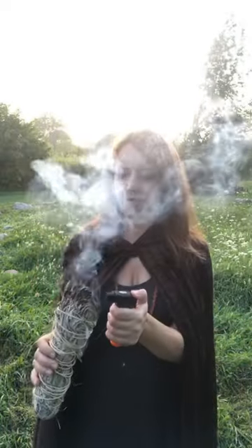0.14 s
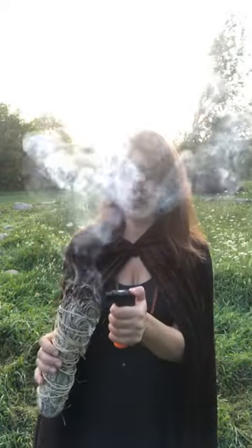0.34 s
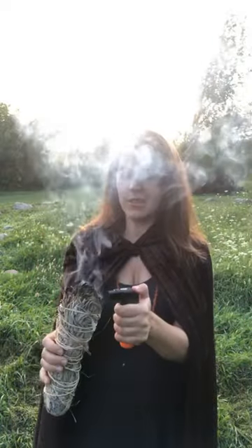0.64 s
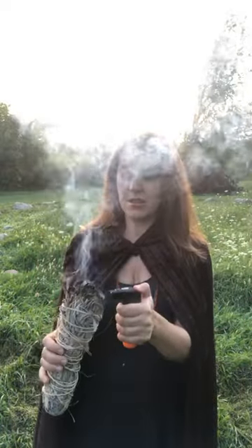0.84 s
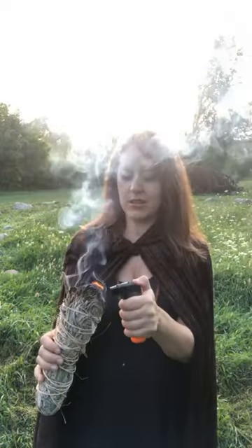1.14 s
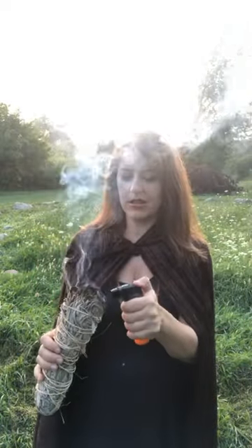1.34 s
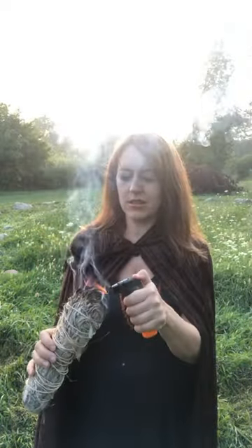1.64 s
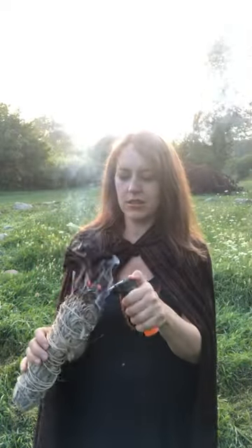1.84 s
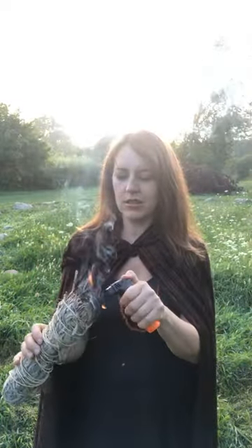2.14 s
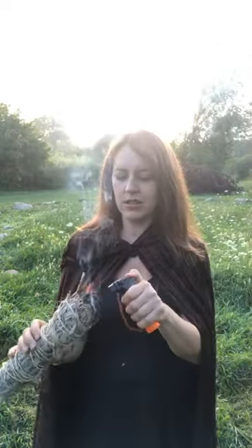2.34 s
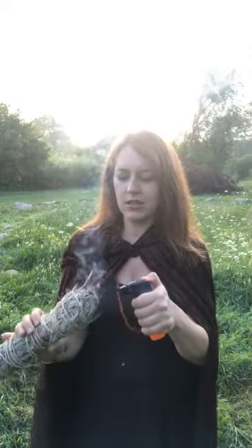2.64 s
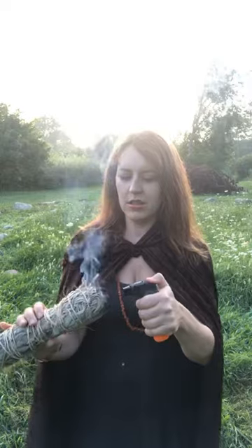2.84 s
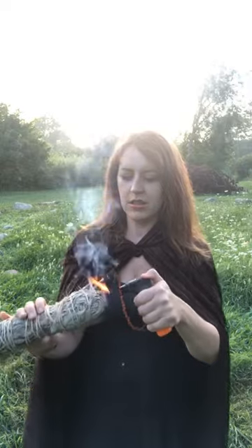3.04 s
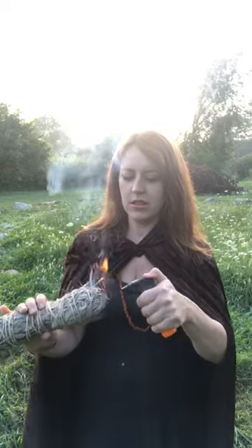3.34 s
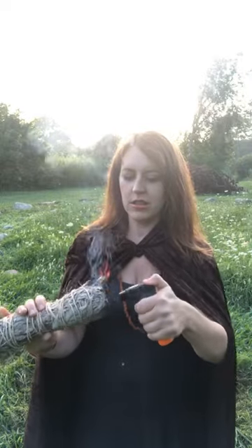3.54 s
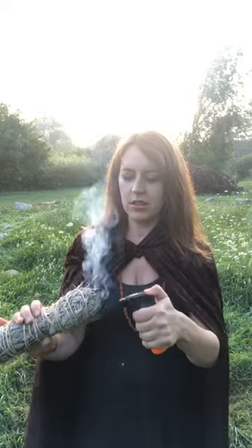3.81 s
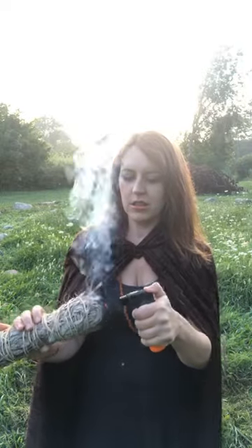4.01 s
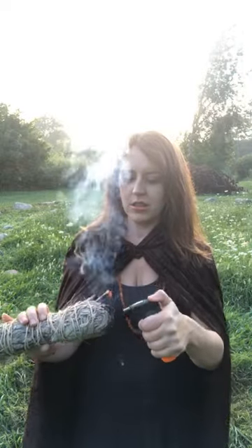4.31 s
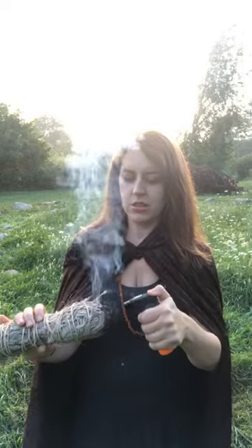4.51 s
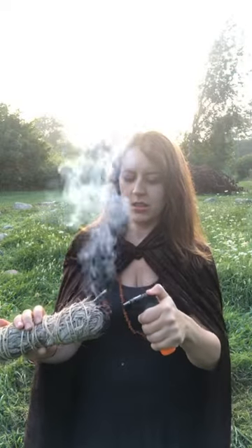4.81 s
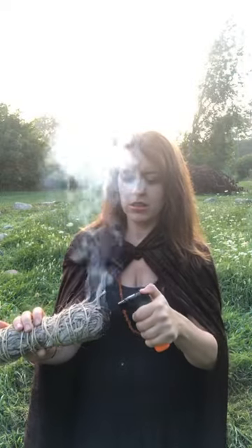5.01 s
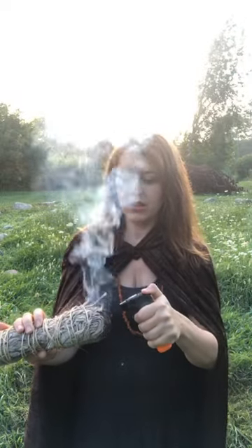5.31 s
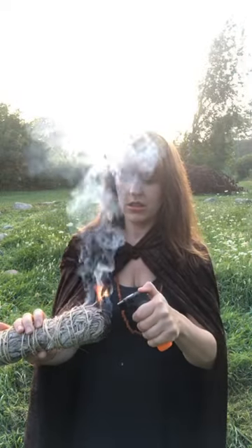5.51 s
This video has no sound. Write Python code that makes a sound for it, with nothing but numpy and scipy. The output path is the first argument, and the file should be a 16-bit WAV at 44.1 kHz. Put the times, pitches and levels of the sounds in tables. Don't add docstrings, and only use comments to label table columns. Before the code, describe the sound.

A piezo striker clicks very loudly at the start, with a soft puff as gas ignites. A quiet, airy flame roar and bright nozzle hiss continue to the end, dipping in gusts and brightening as the torch tips. Sparse herb crackles, quick bird chirps and a later warbling song sit over distant traffic rumble, heard on a phone in an open field.

```python
import sys
import numpy as np
from scipy import signal
from scipy.fft import rfft, irfft, next_fast_len
from scipy.io import wavfile
from scipy.ndimage import uniform_filter1d

SR = 44100
rng = np.random.default_rng(int(sys.argv[2]) if len(sys.argv) > 2 else 0)


def dump(signal):
    limited = np.clip(np.atleast_2d(signal).T, -1, 1)
    pcm = np.round(limited * 32767).astype(np.int16)
    wavfile.write(sys.argv[1], SR, pcm)


def volts_from_decibels(level):
    exponent = np.asarray(level, float) / 20
    return 10 ** exponent


N = 249606
TIME = np.arange(N) / SR
SIZE = next_fast_len(N, real=True)
FREQ = np.fft.rfftfreq(SIZE, 1 / SR)


def torch():
    # (frequency [Hz], density [dB per Hz])
    roar_near = [(330, -43), (480, -11.5), (540, -7.5), (650, -1), (786, -2.5), (865, -8.5), (1060, -1),
                 (1440, -3), (1900, -4), (2500, -10), (3300, -20.5)]
    # (frequency [Hz], density [dB per Hz])
    roar_down = [(330, -42), (480, -12.5), (560, -3.5), (799, 0), (879, -6), (982, -7), (1080, -0.5),
                 (1540, -1), (2010, -2.5), (2500, -8.5), (3300, -27)]
    # (frequency [Hz], density [dB per Hz])
    flame_edge = [(1700, -29), (2400, -3), (3000, -2), (3800, -1.5), (4870, -6), (6000, -7), (7500, -9),
                  (8800, -16), (11000, -27)]
    # (frequency [Hz], density [dB per Hz])
    nozzle_jet = [(5000, -29), (7500, -9.5), (8900, -19), (10400, -11.5), (13300, -1.5), (14200, 0),
                  (15100, 0.5), (16000, -6)]
    # (frequency [Hz], density [dB per Hz])
    unlit_gas = [(350, -32), (550, -10), (3080, -11), (4400, -11), (6000, -9), (7000, -3), (9030, -14),
                 (11000, -0.5), (13500, -8), (16000, -12)]
    # (time [s], level [dB])
    aim = [(0.2, -2.5), (0.4, -4.5), (0.62, -3.5), (0.9, -5), (1.2, -1), (1.5, -2), (1.65, -3), (1.9, -6),
           (2.15, -5.5), (2.27, -0.5), (2.45, -1.5), (2.55, 3), (2.75, 0.5), (3.36, 1), (3.55, 2),
           (4.82, 1.5), (5.12, 2), (5.66, 0.5)]
    # (time [s], half length [s], jet change [dB])
    gusts = [
        (0.95, 0.04, -4),
        (1.39, 0.04, -3.5),
        (1.55, 0.055, -4),
        (1.95, 0.023, -6.5),
        (2.06, 0.075, -5),
        (3.8, 0.15, -1.5),
        (4.01, 0.025, -2.5),
        (4.25, 0.05, 0),
        (5.01, 0.059, -4),
    ]
    # (time [s], half length [s], flame change [dB])
    flares = [
        (1.726, 0.082, 2.5),
        (2.0, 0.021, 3.5),
        (2.17, 0.021, 1.5),
        (3.64, 0.14, 1.5),
        (2.28, 0.043, -3),
    ]

    aim_db = np.interp(TIME, *np.transpose(aim))
    gust_db = bumps(gusts)
    flare_db = bumps(flares)
    roar_db = -54 + 0.22 * gust_db + flare_db
    edge_db = -59.5 + 0.22 * aim_db + 0.31 * gust_db + flare_db
    jet_db = -59.5 + aim_db + gust_db
    uncover_db = np.interp(TIME, (2.42, 2.64), (-7, 0))
    whistle_db = -70.5 + 0.4 * aim_db + 0.3 * gust_db + uncover_db

    ignite_s, catch_s = 0.072, 0.017
    lit = 1 - np.exp(-np.clip(TIME - ignite_s, 0, 1) / catch_s)
    tip = np.interp(TIME, (1.86, 2.6), (0, np.pi / 2))
    roar = np.cos(tip) * turbulence(shape(roar_near), 0.63, 9.13, 0.66)
    roar = roar + np.sin(tip) * turbulence(shape(roar_down), 0.44, 9, 0.3)
    flame = roar * volts_from_decibels(roar_db) + turbulence(shape(flame_edge), 0.67, 14, 0.44) * volts_from_decibels(edge_db)
    jet = turbulence(shape(nozzle_jet), 0.6, 13, 0.9) * volts_from_decibels(jet_db)
    whistle = turbulence(peak(9550, width_hz=590) ** 2, 0.6, 7.1, 0.6) * volts_from_decibels(whistle_db)
    raw_gas = turbulence(shape(unlit_gas), 0.75, 18, 0.47) * volts_from_decibels(-57)
    return lit * (flame + jet + whistle) + (1 - lit) * raw_gas


def striker():
    # (time [s], peak [dB], decay [ms])
    snaps = [
        (0.082, -26, 0.21),
        (0.0814, -4.5, 0.28),
        (0.0818, -9.5, 0.28),
        (0.0832, -8, 0.6),
        (0.087, -26, 0.55),
    ]
    # (frequency [Hz], density [dB per Hz])
    snap_colour = [(500, -40), (1200, -37), (1740, -37), (2170, -14), (3800, -9), (4940, -1.5),
                   (5630, -5.5), (6790, -1.5), (8450, -6), (9640, 1.5), (10900, -2), (12400, -4),
                   (14300, 0.5), (16500, -23)]
    # (frequency [Hz], level [dB], t60 [s])
    shell = [(6358, -11, 0.054), (9300, 2, 0.029), (10300, -5, 0.06), (11200, -9, 0.051),
             (11540, -12, 0.066), (12410, -12, 0.048), (12300, -12, 0.04), (13420, -15, 0.085),
             (14280, -18, 0.1), (15500, -14, 0.049)]
    # (frequency [Hz], level [dB], t60 [s])
    hammer = [(5000, -10, 0.0029), (3720, -15, 0.0027), (6720, -18, 0.0035), (9900, -15, 0.004),
              (13300, -13, 0.003)]

    t = TIME[:SR // 3]
    blow, spray = rng.standard_normal((2, len(t)))
    strike_s = snaps[1][0]
    snap = blow * sum(volts_from_decibels(db - 0.1) * burst(s, ms, t) for s, db, ms in snaps)
    after = np.clip(t - strike_s, 0, 1)
    direct = snap + volts_from_decibels(-32) * modes(shell, after) + volts_from_decibels(-2.5) * modes(hammer, after)

    ground_s = 0.0066
    echo = volts_from_decibels(-16) * np.roll(direct, int(ground_s * SR))
    near_grass = volts_from_decibels(-32.5) * burst(strike_s + ground_s, 7.8, t)
    far_grass = volts_from_decibels(-43.0) * burst(strike_s, 43, t)
    scatter = spray * (near_grass + far_grass)

    puff_s, puff_hz = 0.0855, 325
    puff = volts_from_decibels(-35) * burst(puff_s, 2.5) * np.sin(2 * np.pi * puff_hz * (TIME - puff_s))
    return coloured(unit(shape(snap_colour)), direct + echo + scatter) + puff


def herbs():
    # (time [s], peak [dB], centre [Hz], width [Hz])
    crackles = [
        (0.467, -46, 10500, 3000),
        (1.179, -43, 11000, 4000),
        (1.6205, -52, 12000, 5000),
        (1.999, -48, 4500, 5000),
        (3.5416, -32.5, 8000, 9000),
        (3.5427, -33, 5000, 11000),
    ]
    out = np.zeros(N)
    t = TIME[:256]
    for s, db, hz, width in crackles:
        grain = rng.standard_normal(len(t)) * burst(0, 0.42, t)
        pop = signal.lfilter(*signal.iirpeak(hz, hz / width, SR), grain)
        out[int(s * SR):][:len(t)] += volts_from_decibels(db) * pop / np.abs(pop).max()
    return out


def birds():
    chirper = coloured(peak(4700, width_hz=1400), chirper_song())
    warbler = coloured(peak(5350, width_hz=2200), warbler_song())
    lag = TIME[:SR // 2]
    hedge_t60_s = 0.18
    hedge = rng.standard_normal(len(lag)) * 1000 ** (-lag / hedge_t60_s) * (lag > 0.003)
    sent = volts_from_decibels(0.4) * (volts_from_decibels(-5) * chirper + warbler)
    return chirper + warbler + signal.fftconvolve(sent, hedge / np.linalg.norm(hedge))[:N]


def chirper_song():
    # (start [s], length [s], from [Hz], to [Hz], level [dB])
    chirps = [(0.0, 0.022, 4300, 4750, -54), (0.105, 0.035, 4180, 4590, -62),
              (0.195, 0.062, 3600, 4790, -59), (1.93, 0.04, 5000, 5400, -62),
              (2.052, 0.042, 4200, 4900, -58), (2.155, 0.05, 3700, 4800, -58),
              (2.272, 0.048, 3700, 4820, -57), (2.422, 0.048, 3900, 4880, -58),
              (5.148, 0.05, 5050, 5270, -67), (5.207, 0.022, 4050, 4880, -62),
              (5.272, 0.032, 4350, 4870, -56), (5.322, 0.068, 4000, 5000, -61),
              (5.403, 0.036, 3950, 4850, -56)]
    return volts_from_decibels(0.5) * sing(chirps, bend=0.9, loudest=0.68, start_db=-5, end_db=-6)


def warbler_song():
    # (start [s], length [s], from [Hz], to [Hz], level [dB])
    drops = [
        (2.876, 0.03, 6150, 5380, -56),
        (3.088, 0.045, 6500, 5300, -60),
        (3.28, 0.055, 6550, 5200, -58),
        (3.49, 0.038, 6650, 5130, -59),
        (3.662, 0.048, 4550, 3550, -56),
        (3.84, 0.047, 4800, 3250, -54),
    ]
    # (start [s], length [s], from [Hz], to [Hz], level [dB])
    droops = [
        (2.92, 0.045, 5250, 4700, -62),
        (3.133, 0.052, 5280, 4050, -56),
        (3.355, 0.04, 5250, 4450, -58),
        (3.535, 0.055, 5200, 4780, -61),
    ]
    # (start [s], length [s], from [Hz], to [Hz], level [dB])
    plunges = [
        (4.028, 0.064, 6900, 3900, -57),
        (4.16, 0.054, 8400, 4400, -58),
    ]
    # (start [s], length [s], from [Hz], to [Hz], level [dB])
    climbs = [
        (3.605, 0.05, 4800, 5400, -64),
        (3.712, 0.048, 3600, 5500, -53),
        (3.892, 0.045, 3300, 5420, -53),
    ]
    # (start [s], length [s], from [Hz], to [Hz], level [dB])
    holds = [
        (3.34, 0.075, 5230, 5330, -54),
        (3.685, 0.04, 4950, 5250, -68),
        (3.752, 0.022, 5300, 5550, -50),
        (3.78, 0.055, 5540, 5500, -60),
        (3.875, 0.04, 4000, 4850, -59),
        (3.932, 0.02, 5400, 5430, -53),
        (3.958, 0.055, 5250, 5450, -64),
    ]
    song = sing(drops, bend=2.1, loudest=0.4, start_db=-3, end_db=-5)
    song = song + sing(droops, bend=-1.2, loudest=0.3, start_db=-4, end_db=-4)
    song = song + sing(plunges, bend=0.6, loudest=0.55, start_db=-4, end_db=-5)
    song = song + sing(climbs, bend=-0.5, loudest=0.85, start_db=-8, end_db=-1)
    return song + sing(holds, bend=1.5, loudest=0.25, start_db=-2, end_db=-8)


def road():
    # (frequency [Hz], density [dB per Hz])
    rumble = [(9, -35), (15, -14), (35, -4.5), (65, 1), (90, -2.5), (118, 3), (140, -1.5), (160, -9.5),
              (195, -9.5), (240, -18), (381, -18), (480, -19.5), (700, -39.5)]
    # (time [s], half length [s], change [dB])
    lulls = [
        (0.02, 0.12, -0.5),
        (0.75, 0.063, -1.5),
        (1.18, 0.08, -1),
        (2.4, 0.48, -0.5),
        (2.75, 0.071, -1),
        (4.75, 0.22, -2),
        (5.48, 0.043, -3.5),
    ]
    whump_db = bumps([(0.1, 0.028, 4)])
    level_db = -51.2 + bumps(lulls) + whump_db
    return volts_from_decibels(level_db) * turbulence(shape(rumble), 0.33, 3.25, 0.5)


def sing(notes, bend, loudest, start_db, end_db):
    song, waver = np.zeros(N), walk(130)
    for s, length, from_hz, to_hz, db in notes:
        span = slice(int(s * SR), int((s + length) * SR))
        part = (TIME[span] - s) / length
        glide = np.expm1(-bend * part) / np.expm1(-bend)
        pitch = (from_hz + (to_hz - from_hz) * glide) * (1 + 0.011 * waver[span])
        swell_db = np.interp(part, (0, loudest, 1), (start_db, 0, end_db))
        fade = np.clip(np.minimum(part, 1 - part) * length / 0.0021, 0, 1)
        tone = np.sin(2 * np.pi * np.cumsum(pitch) / SR)
        song[span] += np.sqrt(2) * volts_from_decibels(db + swell_db) * fade * tone
    return song * volts_from_decibels(2.0 * walk(155))


def turbulence(gain, flicker_db, rate, together_db):
    spectrum = rfft(rng.standard_normal(SIZE)) * gain
    shared, out = walk(rate), 0
    octave = np.log2(FREQ + 1)
    heard = octave[gain > gain.max() / 30]
    low, high = int(heard[0]), int(heard[-1]) + 1
    for band in range(low, high + 1):
        share = np.clip(1 - np.abs(np.clip(octave, low, high) - band), 0, 1)
        level_db = flicker_db * walk(rate) + together_db * shared
        out = out + irfft(spectrum * share, SIZE)[:N] * volts_from_decibels(level_db)
    return unit(out)


def walk(rate):
    knots = uniform_filter1d(np.repeat(rng.standard_normal(900), 4), size=5)
    return 1.3 * np.interp(TIME * rate * 4, np.arange(len(knots)), knots)


def modes(rows, after):
    return sum(volts_from_decibels(db) * np.sin(2 * np.pi * hz * after) * 1000 ** (-after / t60) for hz, db, t60 in rows)


def burst(s, ms, t=TIME):
    return (t >= s) * np.exp(-np.clip(t - s, 0, 1) * 1000 / ms)


def bumps(rows):
    return sum(db * np.exp(-((TIME - s) / half_s) ** 2) for s, half_s, db in rows)


def shape(points):
    hz, db = np.transpose(points)
    return volts_from_decibels(np.interp(np.log(FREQ + 1), np.log(hz), db, left=-120, right=-120))


def peak(hz, width_hz):
    return 1 / np.sqrt(1 + ((FREQ - hz) / (width_hz / 2)) ** 2)


def coloured(gain, sound):
    return irfft(rfft(sound, SIZE) * gain, SIZE)[:N]


def unit(sound):
    return sound / np.sqrt(np.mean(sound ** 2))


def scene():
    snap = striker()
    trace = volts_from_decibels(-34) * np.gradient(snap) * np.array([[1], [-1]])
    return torch() + snap + herbs() + birds() + road() + trace


def roll_off(x):
    return signal.sosfilt(signal.butter(12, 15720, fs=SR, output="sos"), x)


def record(dry):
    ceiling = 1.1
    mix = ceiling * np.tanh(dry / ceiling)
    return roll_off(mix)


dry = scene()
out = record(dry)
dump(out)
```